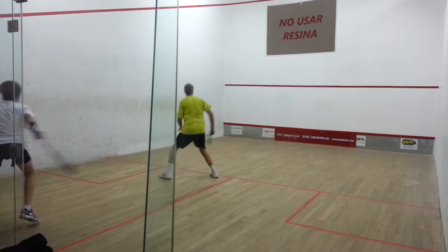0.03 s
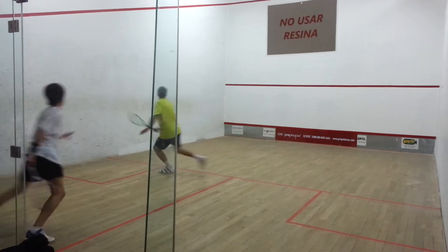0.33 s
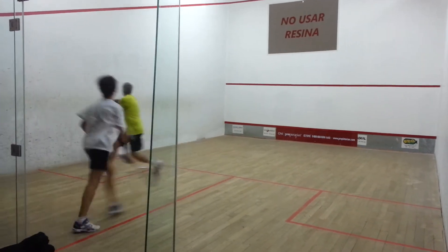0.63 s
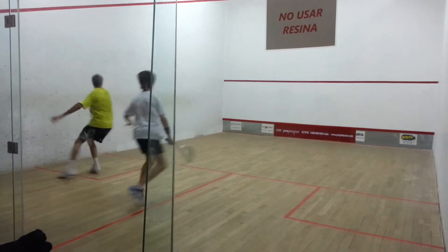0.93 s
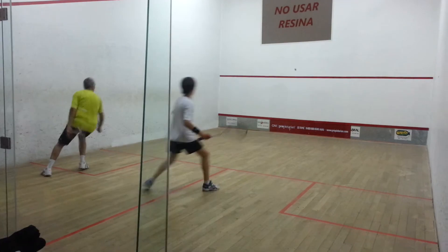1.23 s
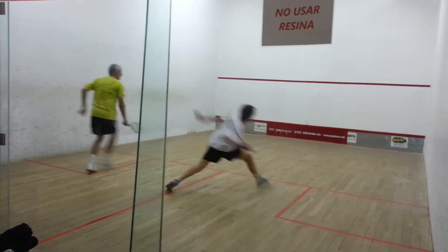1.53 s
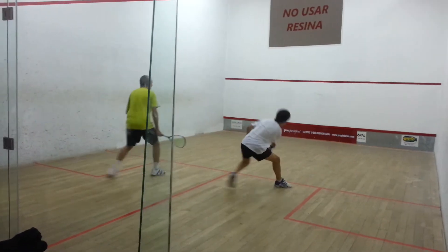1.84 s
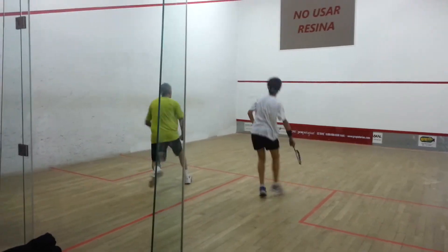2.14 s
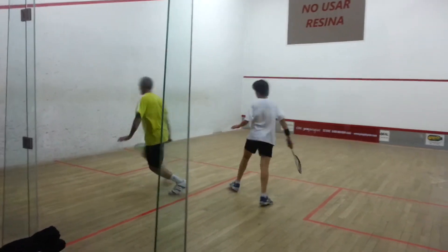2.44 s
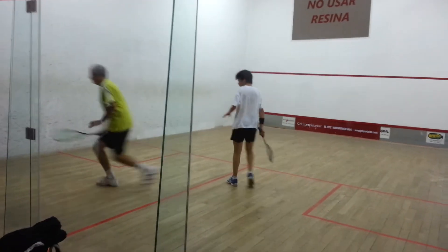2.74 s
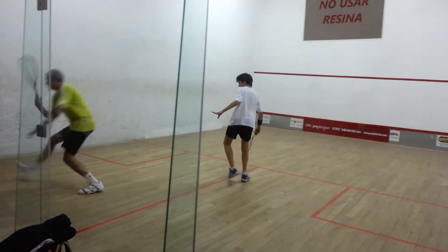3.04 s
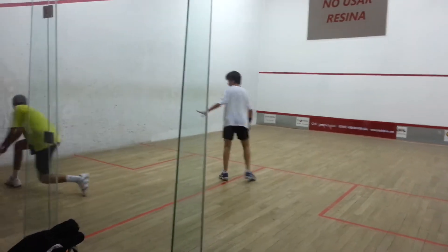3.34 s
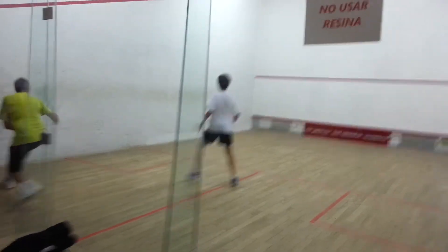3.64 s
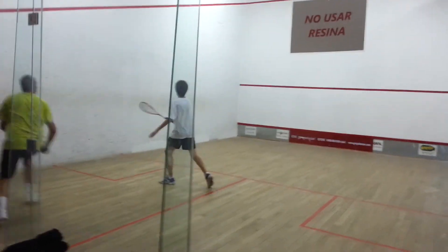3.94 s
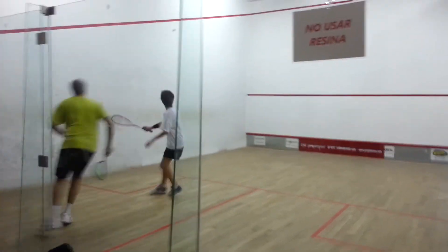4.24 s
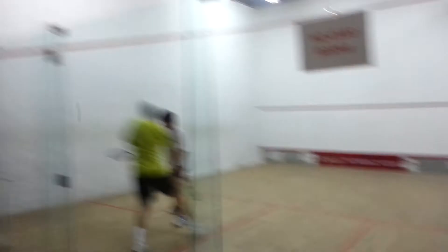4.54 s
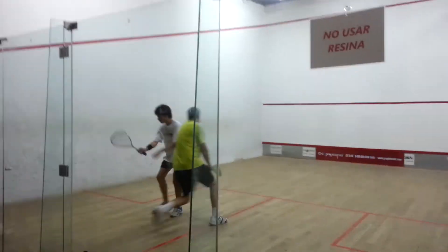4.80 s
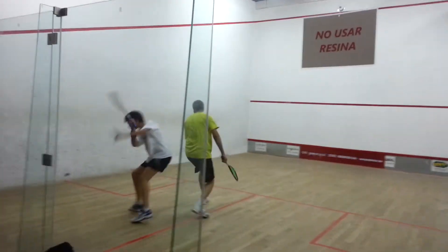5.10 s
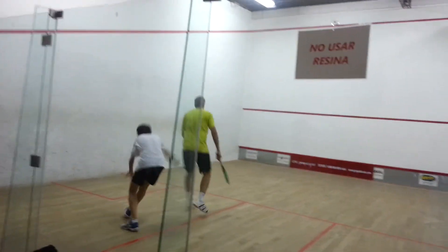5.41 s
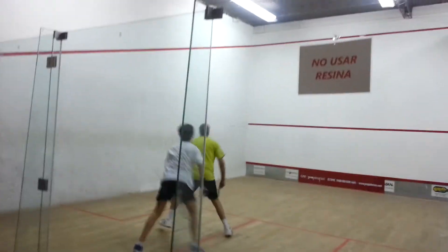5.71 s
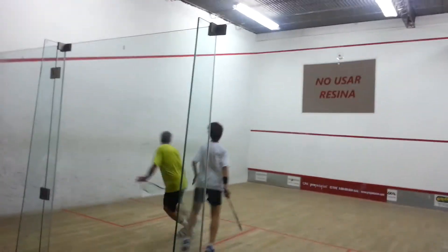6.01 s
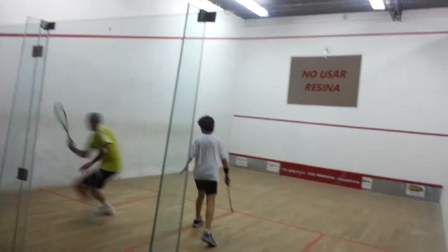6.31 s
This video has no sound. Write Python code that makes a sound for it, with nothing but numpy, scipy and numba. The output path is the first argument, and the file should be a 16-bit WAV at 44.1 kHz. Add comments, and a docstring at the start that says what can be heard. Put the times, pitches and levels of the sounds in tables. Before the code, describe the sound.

Loud racket cracks and hollow ball smacks echo around a squash court as sneakers squeak and thud on the wooden floor.

```python
"""A hard, echoing squash court, heard from just behind its glass back wall during a rally.
Rackets crack, the hollow ball booms off the walls and bounces, heels thud on the wooden floor
and rubber soles squeak as they stick and slip. The hall adds a steady wash of noise.
The hand-held microphones overload on each smack, and a limiter (an automatic volume control)
holds the long echo level before it fades."""
import sys
import numpy as np
from scipy import signal
from scipy.io import wavfile
from numba import njit

SR = 44100
rng = np.random.default_rng(int(sys.argv[2]) if len(sys.argv) > 2 else 0)


def master(y):
    """Save y as 16-bit WAV."""
    cut = np.clip(np.atleast_2d(y).T, -1, 1)
    pcm = np.round(cut * 32767)  # scale
    wavfile.write(sys.argv[1], SR, pcm.astype(np.int16))


N = 284883


def amp(db):
    """Turns decibels into a number to multiply by."""
    return 10 ** (np.asarray(db) / 20)


def unit_level(x):
    """Scales a signal to an average power of one."""
    return x / np.sqrt(np.mean(x ** 2) + 1e-20)


def look_up(table, hz):
    """Reads between the rows of a table, with pitch spaced in octaves."""
    row_hz, value = np.transpose(table)
    return np.interp(np.log(hz + 1), np.log(row_hz + 1), value)


def bell(hz, centre_hz, width_hz):
    """A hump of height one around the pitch where something rings."""
    return 1 / (1 + (2 * (hz - centre_hz) / width_hz) ** 2)


def wobble(count, time_s):
    """Smooth random motion of size one that changes within time_s."""
    window = signal.windows.hann(max(int(time_s * SR), 3))
    motion = signal.fftconvolve(rng.standard_normal(count + len(window) - 1), window, "valid")
    return unit_level(motion - motion.mean())


def add(mix, start_s, sound):
    """Mixes a sound in; one that began before zero is already dying away."""
    start = round(start_s * SR)
    sound = sound[..., max(-start, 0):]
    part = mix[..., max(start, 0):][..., :sound.shape[-1]]
    part += sound[..., :part.shape[-1]]


def click(colour_db, size=2048):
    """The sharpest click of energy one with a given colour (its level at each pitch)."""
    hz = abs(np.fft.fftfreq(size, 1 / SR))
    log_gain = np.log(amp(colour_db(hz)))
    spectrum = np.exp(np.conj(signal.hilbert(log_gain)))  # packs the energy at the start
    sound = np.fft.ifft(spectrum).real
    return sound / np.linalg.norm(sound)


# How alike left and right are (1 is the same, 0 is unrelated): pitch_hz, likeness
STEREO_LIKENESS = [(100, 0.24), (280, 0.91), (500, 0.8), (800, 0.49), (1200, 0.03), (2500, -0.049),
                   (8000, 0.019)]

def surrounding_noise(count, level_db, size=512):
    """Noise from all sides at two close microphones, shaped by level_db(hz, seconds)."""
    hz, t, (left, other) = signal.stft(rng.standard_normal((2, count)), SR, nperseg=size)
    likeness = np.clip(look_up(STEREO_LIKENESS, hz), -1, 1)[:, None]
    right = likeness * left + np.sqrt(1 - likeness ** 2) * other
    shaped = np.array([left, right]) * amp(level_db(hz[:, None], t))
    return signal.istft(shaped, SR, nperseg=size)[1][:, :count]


# How long the court's echo takes to fade by 60 dB: pitch_hz, fade_s
ECHO_FADES = [(100, 1.1), (300, 1.79), (800, 3.12), (1500, 2.02), (2500, 2.28), (4500, 1.7), (7000, 1.37),
              (10000, 0.58), (15000, 0.1)]
# Pitches that the echo favours or swallows: pitch_hz, width_hz, boost_db
ECHO_BANDS = [(430, 110, 2), (565, 156, -3), (760, 260, 1.5)]

def court(sound, early_db, swell_s, direct=0.47, slap=0.033, slap_span_s=0.055, early_s=0.0051):
    """Direct sound, slaps off nearby walls, then a dense echo; early_db lifts the first part."""
    def echo_db(hz, seconds):
        colour_db = sum(db * bell(hz, centre_hz, width_hz) for centre_hz, width_hz, db in ECHO_BANDS)
        return colour_db - 60 * seconds / look_up(ECHO_FADES, hz)
    t = np.arange(2 * SR) / SR
    echo = surrounding_noise(len(t), echo_db)
    echo /= np.sqrt(np.sum(echo ** 2) / 2)
    echo *= 1 + amp(early_db) * np.exp(-t / early_s) / 2
    for side in echo:
        lateness = rng.random(14)  # one value for each slap
        side[(lateness * slap_span_s * SR).astype(int)] += slap * amp(early_db) * (1 - lateness / 2)
    echo[:, 0] += direct * amp(early_db)  # the straight path
    echo *= 1 - np.exp(-(t + 0.00065) / swell_s)  # a sound behind glass or a body swells in
    return signal.fftconvolve(sound[None], echo, axes=1)


def hit(colour, tilt_db_per_octave, ring, hollow):
    """A click: the struck thing rings in one band, and the contact time hollows out another."""
    def colour_db(hz):
        body_db = look_up(colour, hz) + tilt_db_per_octave * np.log2(hz + 100)
        return body_db + sum(band["db"] * bell(hz, band["hz"], band["width_hz"])
                             for band in (hollow, ring))
    return click(colour_db)


# The colour of the hall's background noise: pitch_hz, level_db
HALL_COLOUR = [(100, -33.5), (200, -14), (400, 0.5), (800, -9.5), (1300, 0), (2500, -7.5), (4500, -18),
               (7000, -28), (10000, -41), (15000, -79)]

def hall(level_db=-32):
    """The steady wash of the sports hall, arriving from all sides."""
    wash = surrounding_noise(N, lambda hz, seconds: look_up(HALL_COLOUR, hz))
    return amp(level_db) * unit_level(wash)


# The colour of the ball on a wall: pitch_hz, level_db
BALL_COLOUR = [(100, -32), (200, -32), (330, -11.5), (500, -2), (640, -1), (850, 4), (1150, -3.5),
               (1500, -6), (2200, -5), (3200, -7.5), (4500, -9), (6500, -17), (9000, -17.5), (14000, -31.5)]
# Each smack (more tilt is brighter): start_s, level_db, tilt_db_per_octave, hollow_hz, ring_hz, early_db
WALL_SMACKS = [(-0.55, 15, 3, 1180, 2200, -6), (0.097, 5, -1.6, 1070, 2500, 5),
               (1.001, 16.5, 0, 1174, 2110, -5), (1.879, 17.5, .5, 1380, 2200, 2.5),
               (3.322, 20, 0.56, 1520, 2310, -0.5), (5.031, 18, -0.1, 1400, 1980, -2.5),
               (5.625, 15, 0.17, 1190, 1860, 5.5)]

def wall_smacks(boost_db=12):
    """The hollow ball smacks flat against a wall and booms."""
    out = np.zeros((2, N))
    for start_s, level_db, tilt, hollow_hz, ring_hz, early_db in WALL_SMACKS:
        smack = hit(BALL_COLOUR, tilt, ring=dict(hz=ring_hz, width_hz=1000, db=7.5),
                    hollow=dict(hz=hollow_hz, width_hz=347, db=-9.5))
        add(out, start_s, amp(level_db + boost_db) * court(smack, early_db, swell_s=0.0023))
    return out


# The colour of a racket on the ball: pitch_hz, level_db
RACKET_COLOUR = [(100, -45), (200, -22), (330, -5), (600, 1.5), (900, 3), (1400, -0.5), (2400, -2),
                 (3500, -6), (5000, -7.5), (6500, -17.5), (9000, -17.5), (12000, -33.5), (15000, -45.5)]
# Each stroke: start_s, level_db, tilt_db_per_octave, ring_hz, early_db, swell_s
RACKET_STROKES = [(0.031, 3, 2, 1520, 5.5, 0.00074), (0.794, 2, .5, 1610, 14, 0.0092),
                  (1.735, 8, 1, 1130, -1, 0.004), (3.213, 6, -.5, 1025, 4, 0.011),
                  (4.824, 4, -0.1, 880, -12, .0013)]

def racket_strokes(boost_db=17, hollow_share=0.646):
    """The strings crack against the ball and ring, with a hollow band below the ring."""
    out = np.zeros((2, N))
    for start_s, level_db, tilt, ring_hz, early_db, swell_s in RACKET_STROKES:
        crack = hit(RACKET_COLOUR, tilt, ring=dict(hz=ring_hz, width_hz=210, db=5.5),
                    hollow=dict(hz=hollow_share * ring_hz, width_hz=340, db=-2.5))
        add(out, start_s, amp(level_db + boost_db) * court(crack, early_db, swell_s))
    return out


# The colour of the wooden floor: pitch_hz, level_db
FLOOR_COLOUR = [(100, -10), (230, -4.5), (450, 6), (800, 2.5), (1300, -0.5), (3000, 0), (8000, -16.5),
                (15000, -57)]
# Each heavy step: start_s, level_db
FOOTSTEPS = [(0.04, -1), (0.76, -6), (1.449, -9), (2.17, -6), (2.42, -6), (2.631, -8), (3.271, -7.5),
             (3.72, -7), (4.42, -8), (4.88, -5), (5.3, -12.5)]

def footsteps(boost_db=18):
    """Heels thud on the springy floorboards."""
    out = np.zeros(N)
    thud = click(lambda hz: look_up(FLOOR_COLOUR, hz))
    for start_s, level_db in FOOTSTEPS:
        add(out, start_s, amp(level_db + boost_db) * thud)
    return court(out, early_db=-3, swell_s=0.0065)[:, :N]


# Each squeak of a sole: start_s, length_s, first_hz, settled_hz, level_db, waver_share, early_db
SHOE_SQUEAKS = [(0.663, 0.01, 3680, 3650, -9.5, 0.013, -1), (0.686, 0.099, 3660, 3695, -10.5, .015, 8.5),
                (0.684, 0.082, 4250, 4150, -22, 0.043, 5), (1.027, 0.067, 4240, 4260, -9.5, .019, 8.5),
                (1.098, .068, 3400, 3385, -11, .024, -11), (1.1, .14, 4310, 4364, -10.5, 0.019, -1),
                (1.639, 0.099, 4610, 4888, -11, 0.021, 4), (2.376, 0.078, 3462, 3530, -10, 0.021, 8),
                (2.386, 0.091, 3740, 3766, -11.5, 0.025, 2.5), (2.739, .04, 2273, 2300, -26.5, .02, 6),
                (2.933, .02, 4630, 4240, -14.5, 0.025, 11.5), (2.979, 0.037, 4560, 4303, -17.5, .02, 11),
                (3.938, 0.041, 4660, 4720, -12, 0.029, 5.5), (5.138, 0.078, 6500, 6400, -25.5, .021, 3),
                (6.229, 0.057, 5650, 5480, -21.5, 0.011, 8), (6.231, 0.12, 4140, 4200, -21, 0.018, 15)]

def shoe_squeaks(boost_db=-1, edge_s=0.0013, settle_s=0.015):
    """Rubber sticks and slips thousands of times a second; pitch and grip waver as the sole slides."""
    out = np.zeros((2, N))
    for start_s, length_s, first_hz, settled_hz, level_db, waver_share, early_db in SHOE_SQUEAKS:
        count = int(length_s * SR)
        t = np.arange(count) / SR
        # The pitch settles as weight comes onto the sole, and wavers mostly upward.
        glide_hz = settled_hz + (first_hz - settled_hz) * np.exp(-t / settle_s)
        waver = np.exp(0.16 * wobble(count, time_s=0.0036))
        pitch_hz = glide_hz * (1 + waver_share * unit_level(waver - waver.mean()))
        rasp = 0.1 * wobble(count, time_s=0.00076)  # uneven slips
        phase = 2 * np.pi * np.cumsum(pitch_hz) / SR + rasp
        overtones = np.sin(2 * phase) + amp(-17) * np.sin(3 * phase)
        overtone_db = -15.5 - 19.5 * np.log2(settled_hz / 3570)  # higher squeaks are purer
        grip = np.exp(0.49 * wobble(count, time_s=0.0044))
        tone = unit_level((np.sin(phase) + amp(overtone_db) * overtones) * grip)
        fade_in_out = np.minimum(np.minimum(t, length_s - t) / edge_s, 1)
        squeak = amp(level_db + boost_db) * fade_in_out * tone
        add(out, start_s, court(squeak, early_db, swell_s=0.0005, direct=0.27))
    return out


# Each light bounce: start_s, level_db, tilt_db_per_octave
BALL_BOUNCES = [(3.04, -9, -1.3), (3.729, 5.5, 1.8), (5.415, -1, 1.5)]

def ball_bounces(boost_db=17):
    """The slowed ball lands with a light click, much like a soft racket stroke."""
    out = np.zeros((2, N))
    for start_s, level_db, tilt in BALL_BOUNCES:
        tap = hit(RACKET_COLOUR, tilt, ring=dict(hz=1370, width_hz=280, db=5),
                  hollow=dict(hz=1070, width_hz=130, db=-5))
        add(out, start_s, amp(level_db + boost_db) * court(tap, early_db=4.5, swell_s=0.0029))
    return out


# Knocks, ticks and a rustle by the microphones: start_s, level_db, pitch_hz, width_hz, fade_s
CLOSE_TICKS = [(4.333, -8.5, 2560, 1720, 0.1), (4.476, -26, 6050, 12160, 0.0089),
               (4.485, -18, 5000, 16000, 0.013), (4.4908, -12, 2500, 6000, 0.028),
               (4.499, -11, 2960, 8000, 0.059), (4.684, -36.5, 7500, 5000, 0.45)]

def close_ticks(rise_share=0.045):
    """Brief bursts of noise, too near and too small to make the court echo."""
    out = np.zeros((2, N))
    t = np.arange(SR // 4) / SR
    for start_s, level_db, pitch_hz, width_hz, fade_s in CLOSE_TICKS:
        body = click(lambda hz: 20 * np.log10(bell(hz, pitch_hz, width_hz)))
        rise = 1 - np.exp(-t / (rise_share * fade_s))
        burst = rng.standard_normal((2, len(t))) * amp(level_db - 60 * t / fade_s) * rise
        add(out, start_s, signal.fftconvolve(burst, body[None], axes=1))
    return out


def scene():
    """The rally in the court, over the wash of the hall."""
    rally = racket_strokes() + wall_smacks() + ball_bounces() + footsteps() + shoe_squeaks()
    return rally + close_ticks() + hall()


def microphones(sound, low_cut_hz=200, split_hz=1200, shift_at_s=4.53, shift_takes_s=0.11):
    """Two small microphones with little bass; the treble swings right as they shift in the hand."""
    sound = signal.sosfilt(signal.butter(4, low_cut_hz, "high", fs=SR, output="sos"), sound)
    bass = signal.sosfiltfilt(signal.butter(2, split_hz, fs=SR, output="sos"), sound)
    treble = sound - bass
    sides = np.array([[0.5], [-0.5]])  # a lean is the left level minus the right
    bass_lean_db = -0.95
    treble_lean_db = np.interp(np.arange(N) / SR, [shift_at_s, shift_at_s + shift_takes_s], [3.5, -3.4])
    return bass * amp(sides * bass_lean_db) + treble * amp(sides * treble_lean_db)


@njit
def follow(wanted, rise_speed, fall_speed):
    """Follows a curve with one speed upward and another downward."""
    out, now = np.zeros(len(wanted)), 0.0
    for i in range(len(wanted)):
        now += (wanted[i] - now) * (rise_speed if wanted[i] > now else fall_speed)
        out[i] = now
    return out


def limiter(sound, threshold_db=-14, squeeze=0.68, attack_s=0.025, release_s=0.029, average_s=0.021):
    """Turns loud stretches down, too slowly to catch the start of a smack."""
    step = 1 / (average_s * SR)
    power = signal.lfilter([step], [1, step - 1], (sound ** 2).mean(0))
    excess_db = np.maximum(10 * np.log10(power + 1e-12) - threshold_db, 0)
    smooth_excess_db = follow(excess_db, 1 / (attack_s * SR), 1 / (release_s * SR))
    return sound * amp(-squeeze * smooth_excess_db)


def record(dry, hardness=19.0, top_hz=15100):
    """After the microphones and limiter, overload flattens the peaks and the highest treble is cut."""
    limited = limiter(microphones(dry))
    overloaded = limited / (1 + abs(limited) ** hardness) ** (1 / hardness)
    treble_cut = signal.firwin(511, top_hz, window=("kaiser", 9), fs=SR)
    return signal.oaconvolve(overloaded, treble_cut[None], "same")


dry = scene()
out = record(dry)
master(out)
```